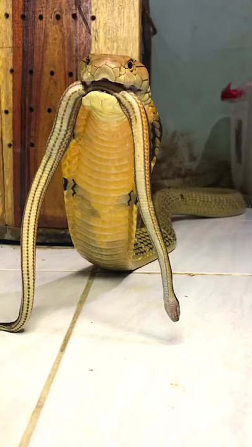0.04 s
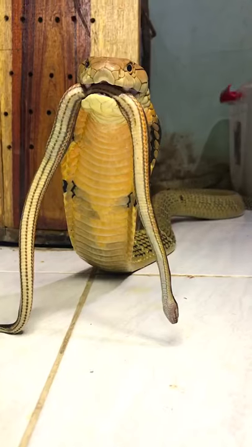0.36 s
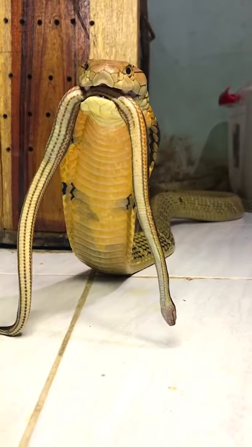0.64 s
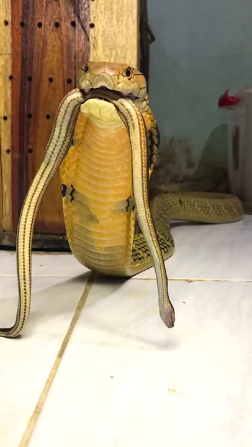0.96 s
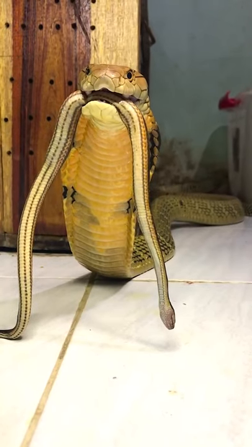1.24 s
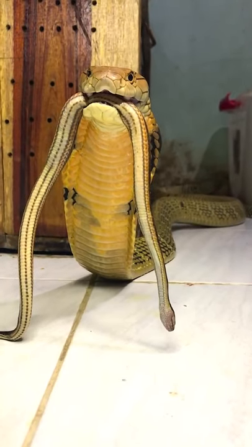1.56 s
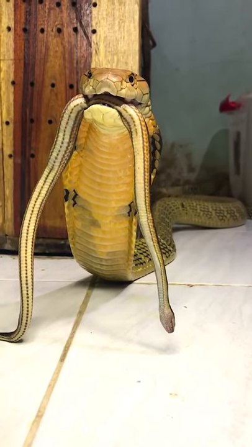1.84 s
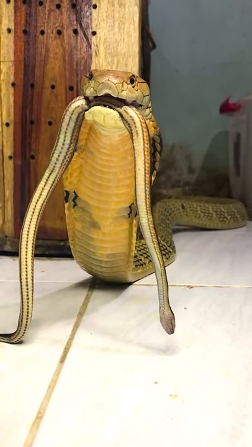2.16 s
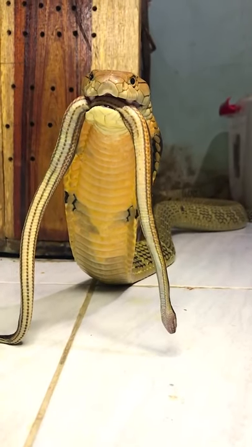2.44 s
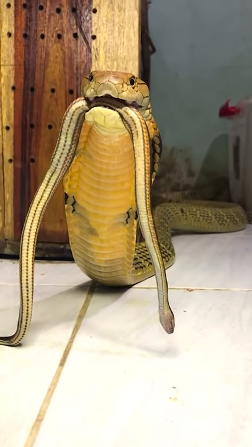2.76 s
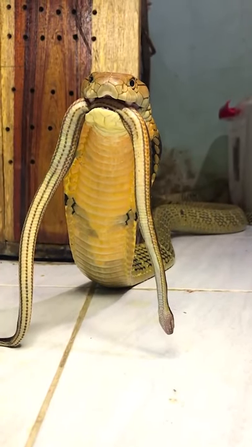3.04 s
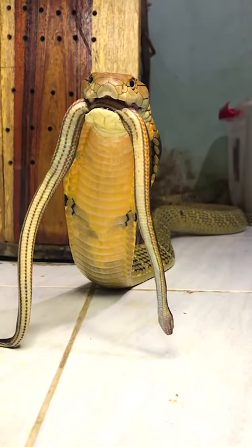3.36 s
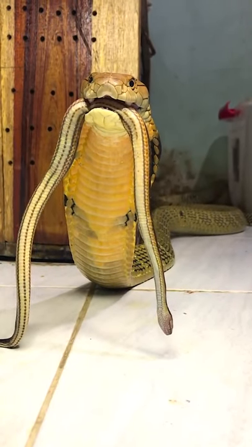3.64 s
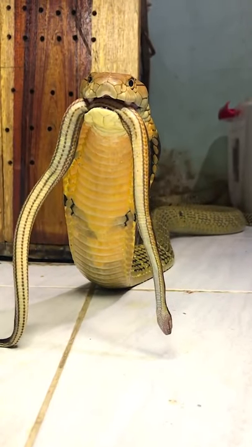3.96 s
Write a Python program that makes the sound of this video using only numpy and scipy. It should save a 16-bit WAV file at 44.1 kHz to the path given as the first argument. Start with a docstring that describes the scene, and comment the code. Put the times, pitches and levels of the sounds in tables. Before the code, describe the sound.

A cobra growls close by, one long, hollow, rasping blast of air that sinks in pitch as it ends. It then draws breath with a thin, faint hiss over a low room hum.

```python
"""Cobra growling on tiles

Prey in its jaws, a cobra drives a long blast of air through the hollows of its windpipe.
Loose tissue flutters in the stream, a rough tone that sinks as the push runs out.
The snake then draws air with a thin, soft hiss. Behind it: low hum, room noise, faint ticks."""
import sys
import numpy as np
from scipy import signal
from scipy.fft import rfft, irfft, next_fast_len
from scipy.io import wavfile
from scipy.ndimage import uniform_filter1d, map_coordinates

SR = 44100
rng = np.random.default_rng(int(sys.argv[2]) if len(sys.argv) > 2 else 0)


def dump_mix(stems):
    """Bounce the given channels to the path in sys.argv[1] as a 16-bit WAV at rate SR."""
    frames = np.atleast_2d(stems).T  # one column per channel
    limited = np.clip(frames, -1, 1)  # hard clip at full scale
    pcm = np.round(limited * 32767).astype(np.int16)
    wavfile.write(sys.argv[1], SR, pcm)


N = 176400
TIME_S = np.arange(N) / SR


def amp(db):
    """Decibels to gain."""
    return 10 ** (np.asarray(db) / 20)


def unit(x):
    """Scale to rms 1."""
    return x / np.sqrt(np.mean(x ** 2) + 1e-20)


def curves(rows):
    """One per-sample curve for each column after the time."""
    times_s, *columns = np.transpose(rows)
    return [np.interp(TIME_S, times_s, column) for column in columns]


def wobble(rate_hz):
    """Smooth random curve, rate_hz knots a second."""
    return map_coordinates(rng.standard_normal(4096), [TIME_S * rate_hz], mode="mirror")


def wavering_phase(hz, jitter, rate_hz):
    """Phase of a tone whose pitch wanders by the fraction jitter."""
    return 2 * np.pi * np.cumsum(hz * (1 + jitter * wobble(rate_hz))) / SR


def burst(start_s, decay_s):
    """Sudden onset, exponential decay."""
    return (TIME_S >= start_s) * np.exp(-np.abs(TIME_S - start_s) / decay_s)


def filtered(x, response):
    """Apply a gain given as a function of frequency."""
    size = next_fast_len(N + 8192)
    return irfft(rfft(x, size) * response(np.fft.rfftfreq(size, 1 / SR)), size)[:N]


def noise(colour):
    """Noise with the given spectrum, rms 1."""
    knots_hz, db = np.transpose(colour)
    gain = lambda hz: amp(np.interp(np.log(hz + 1), np.log(knots_hz), db))
    return unit(filtered(rng.standard_normal(N), gain))


def resonate(modes):
    """Turbulence ringing in steep-sided resonances, rms 1."""
    def gain(hz):
        powers = (amp(db) ** 2 / (1 + ((hz - centre_hz) / width_hz) ** 2) ** 3
                  for centre_hz, width_hz, db in modes)
        return np.sqrt(sum(powers))
    return unit(filtered(rng.standard_normal(N), gain))


def steadied(x, share):
    """Even out a share of the slow swells in a noise, rms 1."""
    level = np.sqrt(np.abs(uniform_filter1d(x ** 2, size=SR // 10)) + 1e-6)
    return unit(x / level ** share)


# Hum partials (frequency [Hz], level [dB])
HUM_PARTIALS = [(64.6, -52), (102.3, -59), (129.2, -62.5), (199.2, -68)]
# Room noise spectrum (frequency [Hz], relative density [dB])
ROOM_COLOUR = [(22, -26), (36, 2), (50, -5.5), (70, 5), (125, 3.5), (170, -2), (230, -9.5), (400, -10),
               (750, -11.5), (1000, -21), (2000, -24), (3400, -22.5), (4300, -24), (4950, -30.5),
               (5600, -27.5), (7600, -35), (8600, -29), (10400, -35.5), (11500, -31.5), (16000, -34.5)]

def room():
    """Slightly wavering machine hum over steady room noise."""
    hum = 0
    for hz, db in HUM_PARTIALS:
        gain = amp(db + 0.14 * wobble(7.9))
        hum += gain * unit(np.sin(wavering_phase(hz, jitter=0.011, rate_hz=9)))
    return hum + amp(-55) * noise(ROOM_COLOUR)


# Windpipe resonances (centre [Hz], width [Hz], relative level [dB])
LOW_HOLLOWS = [(237.7, 10.3, -8.5), (262.4, 25, -9), (349.8, 30.4, -2.5), (374.4, 15, -7), (429, 14.6, -2),
               (457, 13.6, -8.5)]
HIGH_HOLLOWS = [(518.3, 30, -1.5), (583, 20.6, -4.5), (634, 52, -4.5), (702, 34, -13.5), (737, 46, -9.5),
                (791.5, 46, -10)]
# Swell of the high hollows (time [s], relative level [dB])
HIGH_SWELL = [(.1, -3), (.45, 1.5), (.9, 3.5), (1.25, -0.5), (1.42, -0.5), (1.6, -1.5), (1.88, 0),
              (2.12, -2.5), (2.26, -18), (2.31, -14)]

def windpipe(low_db=-3, high_db=-5):
    """Air roars through the hollows of the windpipe."""
    swell_db, = curves(HIGH_SWELL)
    low = amp(low_db) * steadied(resonate(LOW_HOLLOWS), share=0.8)
    high = amp(high_db + swell_db) * steadied(resonate(HIGH_HOLLOWS), share=0.3)
    return low + high


def walls(x, t60_s=0.13, tail_db=-6.5):
    """Tiled floor and walls add a short tail; rms 1."""
    t = np.arange(SR // 5) / SR
    tail = rng.standard_normal(len(t)) * amp(-60 * t / t60_s) * (t > 0.002)
    reflections = signal.fftconvolve(x, tail / np.linalg.norm(tail))[:N]
    return unit(x + amp(tail_db) * reflections)


# Rush spectrum (frequency [Hz], relative density [dB])
RUSH_COLOUR = [(40, -42), (110, -10), (180, 5), (300, 4), (600, 6.5), (820, 5.5), (900, -8.5), (960, -1.5),
               (1080, 0.5), (1270, -3), (1370, -9.5), (1470, -7.5), (1660, -9), (1800, -10.5),
               (2200, -16.5), (2800, -23.5), (3150, -19), (3600, -24), (4020, -18), (4500, -32.5),
               (5600, -27), (7500, -33.5), (16000, -64)]
# Rush against a typical push (time [s], level [dB])
RUSH_SHARE = [(.1, -11.5), (.55, -11.5), (.9, -9), (1.4, -11), (1.7, -11), (1.97, -10), (2.15, -11.5),
              (2.3, -16)]

def jaw_rush(push_db, follow=0.59, rasp_db=0.5):
    """Air rasps past the jaws, offset so that it only partly follows the push."""
    share_db, = curves(RUSH_SHARE)
    offset_db = (follow - 1) * (push_db - np.median(push_db[:N // 2]))
    rasp = amp(rasp_db * wobble(140))
    return amp(share_db + offset_db) * unit(rasp * walls(noise(RUSH_COLOUR)))


# Tissue flutter (time [s], pitch [Hz], level re push [dB])
FLUTTER_PATH = [(.1, 222, -11.5), (.5, 230, -15), (.9, 232.3, -14.5), (1.25, 230, -8), (1.45, 238.8, -5),
                (1.7, 234, -9.5), (1.9, 240, -13), (2.02, 230.4, -18), (2.13, 215, -8.5),
                (2.2, 185.2, -6.5), (2.28, 167, -7)]
# Flutter harmonics (multiple [1], relative level [dB])
FLUTTER_HARMONICS = [(1, 3), (2, -2.5), (3, -34.5)]

def flutter(rough_db=2):
    """Loose tissue buzzes in the stream, unsteady in pitch and strength."""
    hz, level_db = curves(FLUTTER_PATH)
    phase = wavering_phase(hz, jitter=0.013, rate_hz=70)
    tone = sum(amp(db + rough_db * wobble(35.09)) * np.sin(multiple * phase)
               for multiple, db in FLUTTER_HARMONICS)
    return amp(level_db) * unit(tone)


# Push of outgoing air (time [s], level [dB])
AIR_PUSH = [(.08, -35.5), (.14, -33), (.25, -33), (.43, -34.5), (.55, -32.5), (.8, -33), (.95, -35),
            (1.15, -34), (1.35, -34.5), (1.49, -35.5), (1.54, -31.5), (1.63, -33.5), (1.77, -34),
            (1.9, -32.5), (2.06, -34), (2.15, -33), (2.2, -41), (2.265, -48), (2.3, -57.5)]

def growl():
    """One push of air drives hollows, rush, flutter and booms."""
    push_db, = curves(AIR_PUSH)
    closing = np.interp(TIME_S, [2.28, 2.4], [1, 0])
    voice = windpipe() + closing * jaw_rush(push_db) + flutter() + booms()
    return closing * amp(push_db) * voice


# Tick and crackle spectrum (frequency [Hz], relative density [dB])
CLICK_COLOUR = [(2000, -13), (6000, 0), (12000, -2), (16000, 0.5)]

def ticks(first_s=0.0815, period_s=0.2048, decay_s=0.0016):
    """Faint, high, regular ticks."""
    age_s = (TIME_S - first_s) % period_s
    return amp(-58) * np.exp(-age_s / decay_s) * noise(CLICK_COLOUR)


# Surges of the main hollow (time [s], half-width [s], level re push [dB])
BOOM_SURGES = [(0.638, 0.024, 2.5), (0.699, 0.023, -1.5), (0.752, 0.018, 4), (0.859, 0.018, 5.5),
               (1.06, .035, -11), (1.211, 0.024, 2.5), (1.537, 0.024, -0.5)]

def booms(pitch_hz=353):
    """The main hollow briefly locks into a near-pure note."""
    swell = sum(amp(db) * np.exp(-((TIME_S - peak_s) / width_s) ** 2)
                for peak_s, width_s, db in BOOM_SURGES)
    return swell * unit(np.sin(wavering_phase(pitch_hz, jitter=0.015, rate_hz=58.64)))


# Rustles (time [s], decay [s], centre [Hz], width [Hz], level [dB])
RUSTLES = [(.89, 0.055, 4570, 400, -70), (1.02, .05, 5360, 900, -72), (1.24, 0.046, 7500, 2600, -70),
           (1.77, .04, 7500, 2600, -73), (2.305, 0.086, 8300, 1500, -70.5),
           (2.856, 0.072, 5700, 1100, -63.5), (2.858, .035, 7300, 1400, -68)]

def rustles():
    """Mouth and scales rustle softly in narrow, high bands."""
    return sum(amp(db) * burst(start_s, decay_s) * resonate([(centre_hz, width_hz, 0)])
               for start_s, decay_s, centre_hz, width_hz, db in RUSTLES)


# Pull of incoming air (time [s], level [dB])
AIR_PULL = [(2.32, -81), (2.42, -62), (2.55, -57.5), (2.75, -61), (2.95, -60), (3.3, -59.5), (3.7, -59),
            (4, -57.5)]
# Hiss spectrum (frequency [Hz], relative density [dB])
HISS_COLOUR = [(100, -17), (330, 0.5), (470, -3.5), (620, 2), (800, -2), (930, -8), (1150, -4.5),
               (1320, -5.5), (1530, -10.5), (2000, -13.5), (2550, -12.5), (2950, -22), (3200, -7),
               (3700, -23.5), (4400, -16.5), (4950, -23), (5500, -15), (6000, -17.5), (7500, -22),
               (16000, -46)]
# Settled resonances of the opening (centre [Hz], width [Hz], relative level [dB])
WHISTLE_MODES = [(1320, 107, -0.5), (1400, 70, -0.5), (2780, 146, -2.5), (4300, 240, -15), (5400, 380, -12)]

def intake(whistle_start_s=2.42, rise_s=0.22, flat_share=0.14):
    """The lung refills through a narrow opening; its faint whistle rises as the flow builds."""
    pull_db, = curves(AIR_PULL)
    settled = 1 - np.exp(-np.maximum(TIME_S - whistle_start_s, 0) / rise_s)
    pitch_ratio = 1 - flat_share * (1 - settled)
    whistle = map_coordinates(resonate(WHISTLE_MODES), [np.cumsum(pitch_ratio)], mode="mirror")
    flow = amp(pull_db + 1.7 * wobble(9.2))
    return flow * (amp(-2) * noise(HISS_COLOUR) + amp(-6) * settled * whistle)


# Crackles (time [s], decay [s], level [dB])
CRACKLES = [(3.492, .012, -62), (3.582, .025, -64), (3.655, .015, -69), (3.875, .008, -68),
            (3.882, 0.038, -66.5), (3.936, 0.026, -67), (3.97, .02, -63.5)]

def crackles(rough_db=3.7):
    """A few small, dry crackles."""
    envelope = sum(amp(db) * burst(start_s, decay_s) for start_s, decay_s, db in CRACKLES)
    grain = unit(amp(rough_db * wobble(700)))
    return envelope * grain * noise(CLICK_COLOUR)


def scene():
    """Snake and room, close up, in mono."""
    return (room() + growl() + ticks() + rustles() + intake() + crackles())[None]


START_S, TOP_HZ = 0.0775, 15800

def record(dry):
    """Silence before START_S, nothing above TOP_HZ."""
    return filtered(dry[0] * (TIME_S >= START_S), lambda hz: hz < TOP_HZ)[None]


dry = scene()
out = record(dry)
dump_mix(out)
```